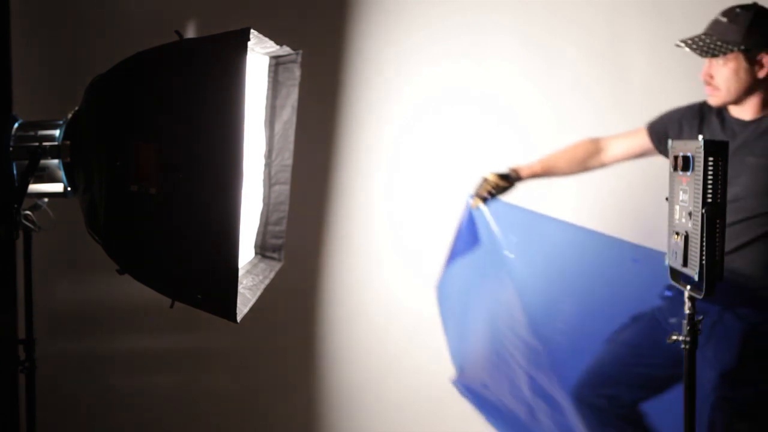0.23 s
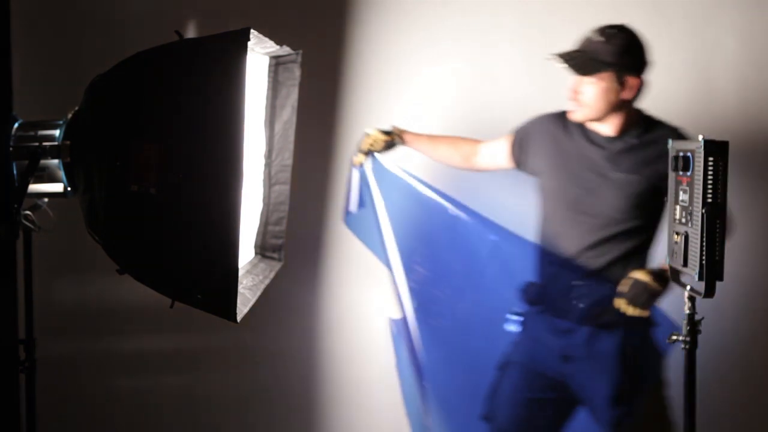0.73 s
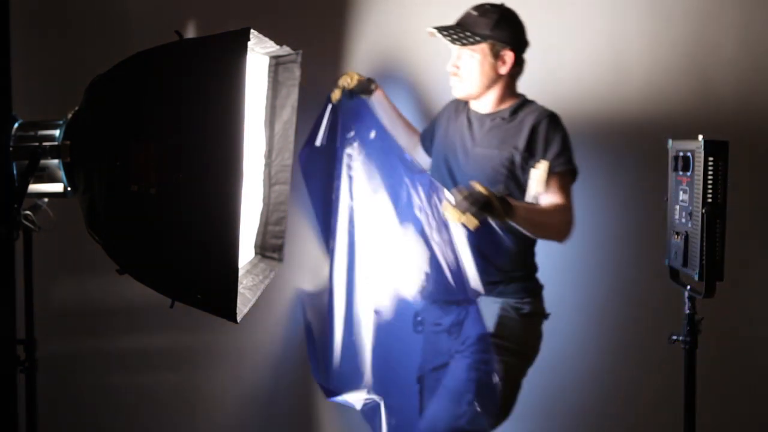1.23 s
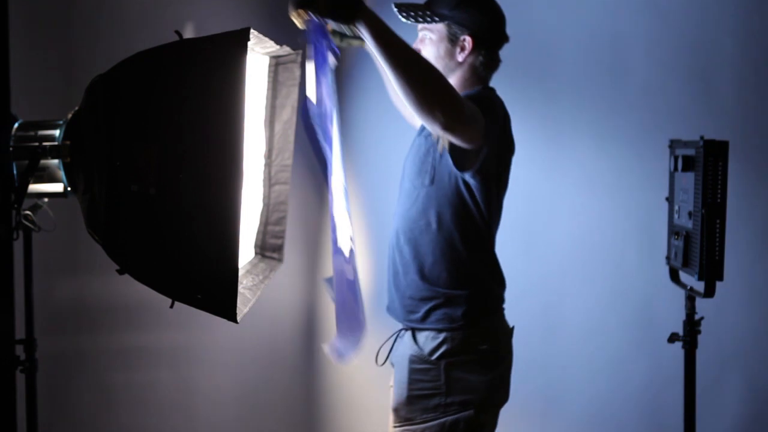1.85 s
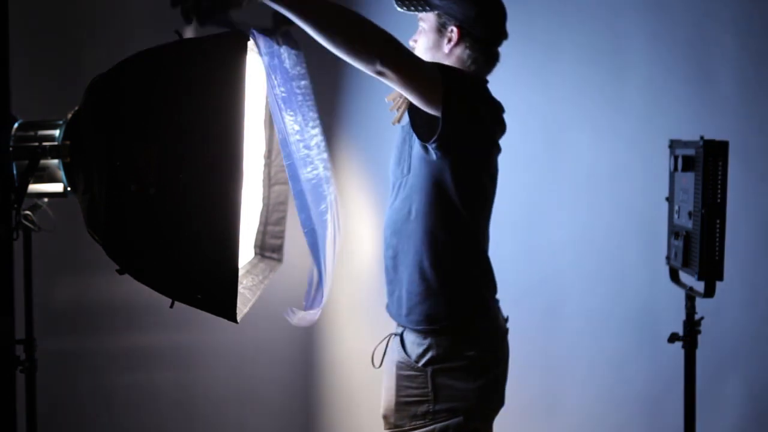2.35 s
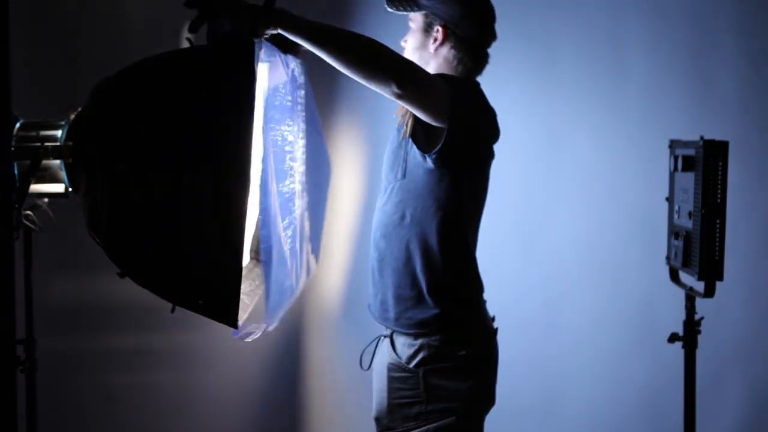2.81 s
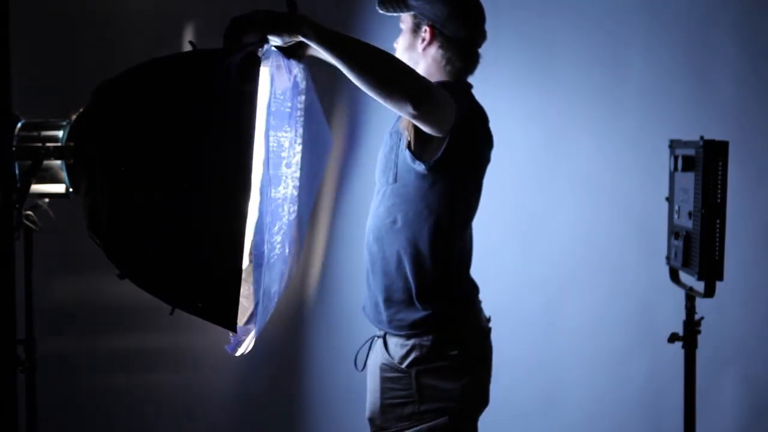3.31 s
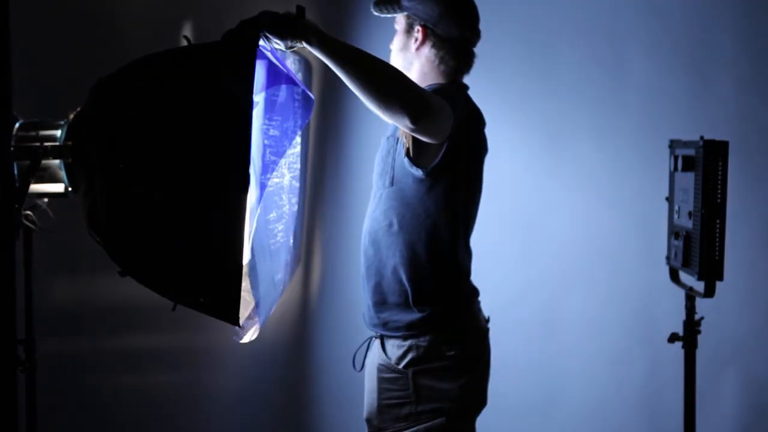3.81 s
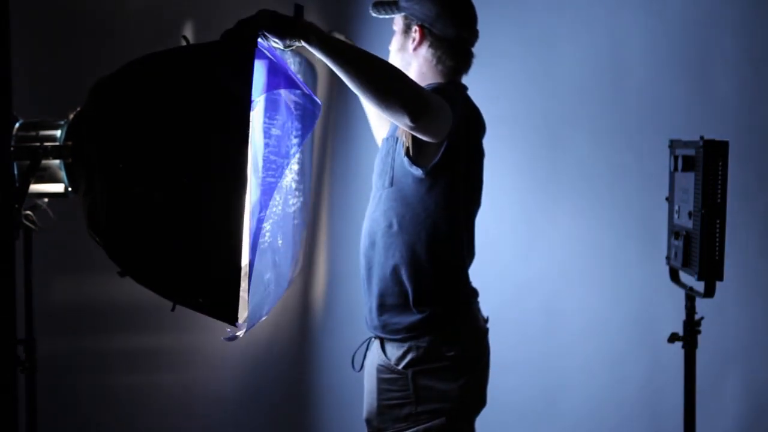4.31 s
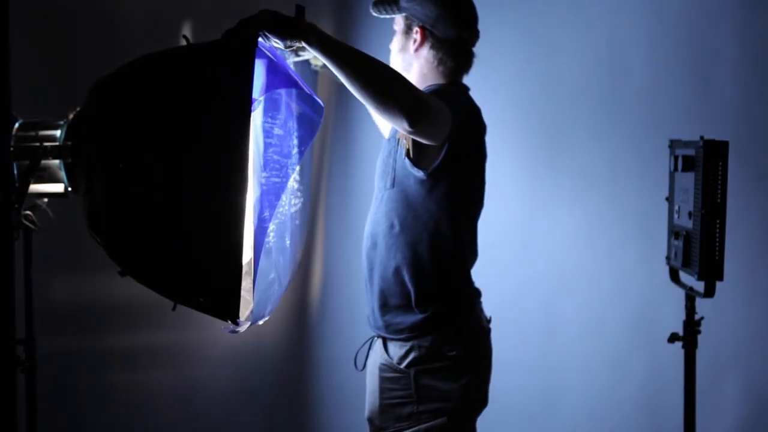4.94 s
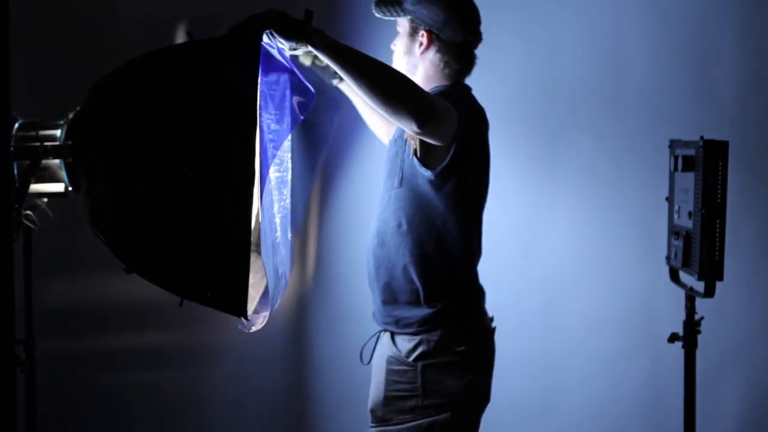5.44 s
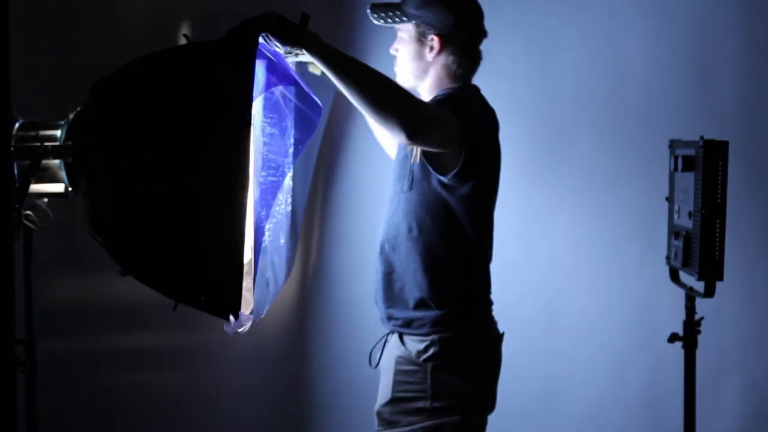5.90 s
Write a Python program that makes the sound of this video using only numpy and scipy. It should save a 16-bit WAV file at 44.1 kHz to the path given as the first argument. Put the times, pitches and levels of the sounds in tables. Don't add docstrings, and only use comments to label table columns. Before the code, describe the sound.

In a bare studio, a large thin plastic sheet is carried and lifted, rustling with broad flexing and bright crackles. A dull footstep lands early. Sharp creases snap in bursts, the handling calms with faint clamp ticks, then crisp crackling returns and fades. One microphone some metres away catches short room reverberation, low rumble, weak hum and a muffled engine outside.

```python
import sys
import numpy as np
from scipy import signal
from scipy.fft import rfft, irfft
from scipy.io import wavfile

SR = 44100
rng = np.random.default_rng(int(sys.argv[2]) if len(sys.argv) > 2 else 0)


def transcribe(u):
    v = np.clip(np.atleast_2d(u).T, -1, 1)
    q = np.round(v * 32767).astype(np.int16)
    wavfile.write(sys.argv[1], SR, q)


def voltage_ratio(level):
    return 10 ** (np.asarray(level, float) / 20)


N = 271778

# time in seconds, flexing level in dB.
EFFORT = [(0.0, -36), (0.5, -39), (0.7, -34.5), (0.95, -24), (1.12, -25.5), (1.4, -27), (1.92, -42),
          (2.2, -32), (2.5, -29.5), (2.85, -37), (3.28, -39.5), (3.5, -29.5), (4.0, -34.5), (4.62, -60),
          (4.82, -45), (4.9, -30), (5.55, -31), (5.9, -41.5)]
# frequency in Hz, level in dB per Hz.
BILLOW_SPECTRUM = [(150, -27), (250, -1), (380, -3), (520, 3.5), (700, 2.5), (1000, -24)]
FLEX_SPECTRUM = [(300, -24.5), (500, -10), (700, -4), (900, -1), (1250, -1), (1800, -4.5), (2600, -13),
                 (4000, -21), (8000, -77)]
CRACKLE_SPECTRUM = [(700, -21.5), (1400, 0.5), (2200, -0.5), (3000, 3.5), (4000, 0.5), (5200, -2.5),
                    (7000, -10.5), (11000, -44)]
SLIDE_SPECTRUM = [(3000, -15.5), (4500, 1.5), (6000, 2.5), (7600, 4), (8600, -2.5), (10500, -14),
                  (11800, -20.5), (12600, -56)]


def rustle():
    flex_db, = in_time(EFFORT)

    lag_s, follows = 0.054, 0.38
    r = np.exp(-1 / (lag_s * SR))
    swing_db = flex_db - flex_db.mean()
    slow_swing_db, _ = signal.lfilter([1 - r], [1, -r], swing_db, zi=[r * swing_db[0]])
    billow_db = -50 + follows * slow_swing_db

    crackle_gain = np.sqrt(voltage_ratio(flex_db - 10.5) ** 2 + grip_power(2))
    slide_gain = np.sqrt(voltage_ratio(flex_db - 18) ** 2 + grip_power(3))

    folding = buckles(900, spread_db=0.5, clump_db=3.5)
    creasing = buckles(1800, spread_db=5.5, clump_db=4.5)
    wide = reverberate(folding + 0.71 * creasing, t60=0.23, wet_db=4.5)
    fine = reverberate(creasing, t60=0.25, wet_db=3.5)
    layers = [
        (voltage_ratio(billow_db), wide, BILLOW_SPECTRUM),
        (voltage_ratio(flex_db), wide, FLEX_SPECTRUM),
        (crackle_gain, fine, CRACKLE_SPECTRUM),
        (slide_gain, fine, SLIDE_SPECTRUM),
    ]
    return sum(gain * rms_one(colour(source, spectrum)) for gain, source, spectrum in layers)


# start in seconds, hold in seconds, crackle level in dB, sliding hiss level in dB.
GRIPS = [(0.0, 0.017, -42.5, -63), (0.255, 0.22, -54, -44.5), (0.492, 0.14, -45, -35.5),
         (0.656, 0.036, -41, -31.5), (0.794, 0.27, -27.5, -40), (1.237, 0.055, -32, -50),
         (1.417, 0.053, -29.5, -40), (1.598, 0.13, -41, -44), (1.983, 0.03, -35, -33),
         (2.052, 0.039, -30.5, -39), (2.4, 0.092, -32.5, -43), (2.574, 0.069, -39, -51),
         (2.665, 0.034, -40, -40), (2.886, 0.15, -32.5, -39), (3.105, 0.082, -37, -43.5),
         (3.305, 0.043, -36, -33), (3.406, 0.054, -30.5, -38), (3.615, 0.15, -33.5, -45),
         (3.858, 0.037, -36.5, -44), (4.277, 0.091, -42, -43.5), (4.713, 0.083, -56, -51),
         (4.904, 0.044, -27.5, -32.5), (5.102, .12, -31.5, -40), (5.257, 0.031, -41, -43),
         (5.372, 0.043, -31, -58), (5.46, 0.037, -31, -44.5), (6.004, 0.021, -54, -41),
         (6.1, 0.028, -56, -54)]


def grip_power(column):
    rise_db_per_s, fall_db_per_s = 180, 97
    t = np.arange(0, N + 40, 40) / SR
    rows = np.array(GRIPS)[:, :, None]
    start, hold = rows[:, 0], rows[:, 1]
    before_db = rise_db_per_s * (start - t)
    after_db = fall_db_per_s * (t - start - hold)
    loss_db = np.maximum(0, np.maximum(before_db, after_db))
    power = np.sum(voltage_ratio(rows[:, column] - loss_db) ** 2, axis=0)
    return np.interp(np.arange(N) / SR, t, power)


def buckles(per_s, spread_db, clump_db):
    sizes = voltage_ratio(spread_db * np.minimum(rng.exponential(1, N), 5)) * rng.choice([-1, 1], N)
    chance = per_s * voltage_ratio(clump_db * drift(12)) / SR
    return rms_one(sizes * (rng.random(N) < chance))


def snaps():
    most_cracks, ring_s = 100, 0.00046
    rows = creases()
    draws = rng.random((len(rows), 2, most_cracks))
    power = np.zeros((3, N + SR))
    for (s, db, bright_db, length), (when, size) in zip(rows, draws):
        cracks = min(3 + int(length * 3000), most_cracks)
        place = np.r_[0, 1.9 * when[1:cracks] - 0.6]
        swell = np.exp(-place ** 2 * np.where(place < 0, 7.0, 2.5))
        share = (size[:cracks] ** 1.5 + 0.15) * swell
        energy = share / share.sum() * (length + 0.00043) * SR
        at = np.round((s + length * place) * SR).astype(int)

        low_db = -5 - max(bright_db, 1.1 * bright_db)
        high_db = -6 + bright_db
        part_db = np.array([[low_db], [0], [high_db]])
        np.add.at(power, (slice(None), at), energy * voltage_ratio(db + part_db) ** 2)

    r = np.exp(-2 / (ring_s * SR))
    envelope = np.sqrt(signal.lfilter([1 - r], [1, -r], power[:, :N] + 1e-18))
    parts = envelope * rng.standard_normal((3, N))
    t60s = (1, 0.62, 0.3)
    spectra = (FLEX_SPECTRUM, CRACKLE_SPECTRUM, SLIDE_SPECTRUM)
    return voltage_ratio(-4.5) * sum(colour(room(x, t60), c) for x, t60, c in zip(parts, t60s, spectra))


# time in seconds, level in dB, brightness in dB.
SNAPS = [(.0486, -37, 8), (.197, -28.5, 4), (0.2683, -26, -8.5), (.678, -23.5, -3), (.8764, -16, 1),
         (0.892, -21.5, 13), (.917, -20, -13), (.9956, -25, -5), (1.0893, -19.5, 1), (1.199, -30, 8),
         (1.224, -14, -5), (1.4445, -20.5, -7), (1.4972, -19, 16.5), (2.3062, -15, -4), (2.3562, -15.5, 8),
         (2.848, -33, 14.5), (2.919, -9.5, 5.5), (2.948, -27, 2), (3.1648, -16.5, 13), (3.1693, -22.5, 12),
         (3.368, -28, 14), (4.2502, -16, 5), (4.7313, -36, 5), (4.8346, -27.5, -6), (4.8614, -13, 3.5),
         (4.976, -17.5, 4.5), (5.1677, -16, 9.5), (5.3652, -12.5, 6), (5.9504, -27.5, 10), (6.0156, -30, 7)]
# time in seconds, level in dB, brightness in dB, length in seconds.
FOLDS = [(.062, -38, -9, 0.016), (.2816, -33, 3.5, 0.011), (.5077, -41, -12.5, 0.064),
         (.7165, -24.5, 0.5, 0.038), (.8101, -21.5, -3.5, 0.013), (1.0275, -21, -9, 0.021),
         (1.2497, -10.5, -0.5, 0.0079), (1.501, -24, 14.5, .004), (1.6518, -36, -4, 0.019),
         (1.8384, -40.5, -8, 0.023), (1.943, -43.5, 15.5, 0.011), (2.001, -30, 3, 0.033),
         (2.292, -26.5, -3, 0.0079), (2.37, -26, -5, 0.032), (2.6373, -28.5, -4, 0.016),
         (2.6543, -28.5, -2, 0.024), (2.7449, -30.5, 0, 0.017), (2.903, -22.5, 9, 0.011),
         (2.942, -18, 0.5, .014), (3.177, -27, -2, 0.0081), (3.2354, -28, 3.5, .013),
         (3.4243, -16, 4, 0.01), (3.4774, -19, 7.5, 0.013), (3.5456, -12, 3, .011),
         (3.7828, -23.5, -5.5, 0.012), (4.8795, -21.5, 6.5, 0.022), (5.2727, -24.5, 2.5, 0.027),
         (5.642, -33.5, -11.5, 0.023), (5.664, -29, -3, 0.012), (6.11, -43, 9, 0.018)]
# start in seconds, number of ticks.
CREAKS = [
    (4.387, 5),
    (4.475, 3),
]


def creases():
    gap_s = 0.0125
    ticks = [(s + k * gap_s, -38, 5.5, 0.0011) for s, count in CREAKS for k in range(count)]
    short_snaps = [(*row, 0.0013) for row in SNAPS]
    return short_snaps + list(FOLDS) + ticks


# time in seconds, peak level in dB.
STEPS = [
    (0.638, -18.5),
    (1.55, -32),
]


def feet():
    clicks = np.zeros(N)
    for s, db in STEPS:
        clicks[round(s * SR)] = voltage_ratio(db + 13.0)
    knock = [(60, -13), (120, -6), (250, 6.0), (500, -1), (800, 0), (1500, -30), (4000, -40)]
    return colour(room(clicks, t60=0.96), knock)


# time in seconds, cycle rate in Hz, load in dB.
ENGINE = [(0.0, 13, -67), (0.5, 12.55, -65.5), (1.0, 12.5, -69), (1.5, 11.7, -65), (2.0, 12.31, -64.5),
          (2.5, 13.26, -55), (3.0, 14, -55.5), (3.5, 16.2, -61.5), (4.0, 18.1, -53.5), (4.4, 17.9, -51.5),
          (4.65, 18.9, -49.5), (4.75, 20, -56), (5.25, 20.5, -55), (5.75, 22.6, -50), (6.17, 23.5, -53.5)]
# multiple of the cycle rate, level in dB.
FIRING = [(4, 9), (5, -4.5), (6, -28), (7, -2.5), (8, -0.5), (9, 2.5), (10, -17), (11, 0), (12, 5),
          (13, -7)]
# frequency in Hz, gain in dB.
WALLS = [(46, -21), (55, -7), (61, -6), (66, 3), (73, -5), (90, -12), (102, 9), (110, 11), (119, 5),
         (130, 11), (144, 6), (160, -10), (213, -7), (300, -15)]
# frequency in Hz, level in dB per Hz.
ROAR = [(20, -22), (40, -3), (70, -4), (130, 0.5), (220, -7.5), (400, -32.5)]


def engine():
    rate, load_db = in_time(ENGINE)
    turn = 2 * np.pi * np.cumsum(rate) / SR
    out = voltage_ratio(load_db + 1.0) * rms_one(colour(rng.standard_normal(N), ROAR))
    for multiple, db in FIRING:
        multiple = round(multiple)
        level_db = load_db + db + at_hz(WALLS, multiple * rate) + 0.8 * drift(2.5)
        phase = multiple * turn + 2 * np.pi * rng.random() + 0.15 * drift(3.0)
        out = out + np.sqrt(2) * voltage_ratio(level_db) * np.sin(phase)
    return out


# frequency in Hz, level in dB per Hz.
RUMBLE = [(20, -38), (45, -10), (90, -5), (140, -0.5), (230, -12.5), (400, -11.5), (1200, -11), (2600, -24),
          (6000, -23.5), (8000, -26), (12000, -52)]


def air():
    hum_hz, hum_db = 204.5, -60.5
    hum_gain = np.sqrt(2) * voltage_ratio(hum_db + 2.3 * drift(0.59))
    hum = hum_gain * np.sin(2 * np.pi * hum_hz * np.arange(N) / SR)
    return hum + voltage_ratio(-48.5) * rms_one(colour(rng.standard_normal(N), RUMBLE))


# delay in seconds, level in dB.
ECHOES = [(.0055, -9), (.011, -12), (.021, -13), (.027, -15), (.032, -16)]


def room(x, t60):
    out = reverberate(x, t60, wet_db=1.5)
    for s, db in ECHOES:
        lag = round(s * SR)
        out[lag:] += voltage_ratio(db) * x[:-lag]
    return out


def reverberate(x, t60, wet_db):
    r = voltage_ratio(-120 / (t60 * SR))
    energy = signal.lfilter([1 - r], [1, -r], x ** 2 + 1e-18)
    return x + voltage_ratio(wet_db) * np.sqrt(energy) * rng.standard_normal(N)


def colour(x, spectrum):
    hz = np.arange(4097) * SR / 8192
    cepstrum = irfft(np.log(voltage_ratio(at_hz(spectrum, hz))))
    cepstrum[1:4096] *= 2
    cepstrum[4097:] = 0
    pulse = irfft(np.exp(rfft(cepstrum)))
    return signal.fftconvolve(x, pulse / np.sqrt(np.sum(pulse ** 2)))[:len(x)]


def drift(rate):
    hop = 40
    r = np.exp(-2 * np.pi * rate * hop / SR)
    slow = signal.lfilter([1], [1, -2 * r, r * r], rng.standard_normal(N // hop + 2002))[2000:]
    return np.interp(np.arange(N) / hop, np.arange(len(slow)), rms_one(slow))


def rms_one(x):
    return x / np.sqrt(np.mean(x ** 2) + 1e-20)


def in_time(rows):
    s, *columns = np.transpose(rows)
    return [np.interp(np.arange(N) / SR, s, c) for c in columns]


def at_hz(points, hz):
    point_hz, point_db = np.transpose(points)
    return np.interp(np.log(np.maximum(hz, 1)), np.log(point_hz), point_db)


def scene():
    mono = rustle() + snaps() + feet() + engine() + air()
    return np.array([mono, mono])


def top_cut(x):
    return signal.sosfilt(signal.butter(12, 12760, fs=SR, output="sos"), x)


def record(dry):
    rounded = 0.7 * np.tanh(dry / 0.7)
    low_pass = signal.cheby2(10, 60, 13340, fs=SR, output="sos")
    mix = signal.sosfilt(low_pass, rounded)
    return top_cut(mix)


dry = scene()
out = record(dry)
transcribe(out)
```